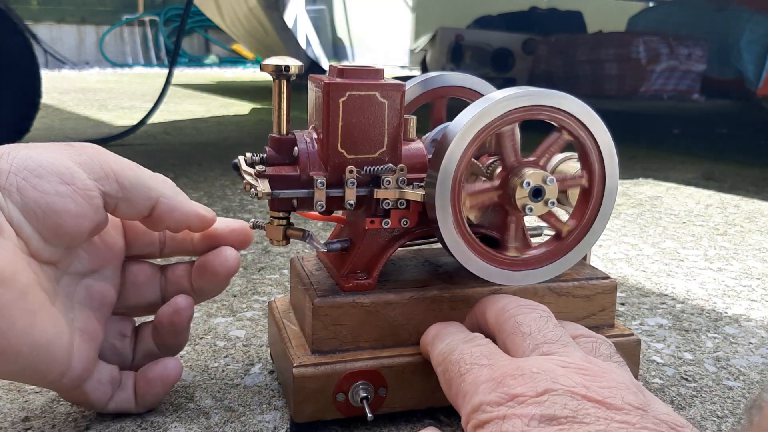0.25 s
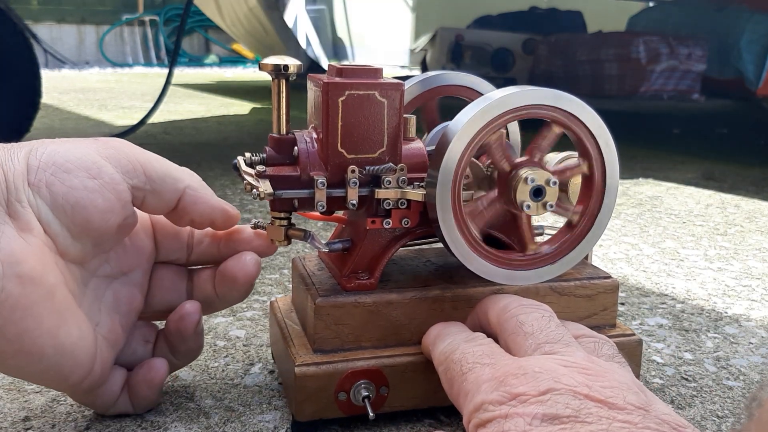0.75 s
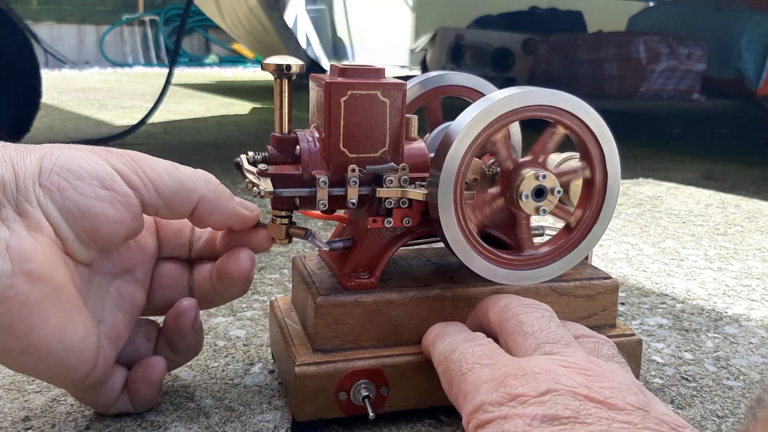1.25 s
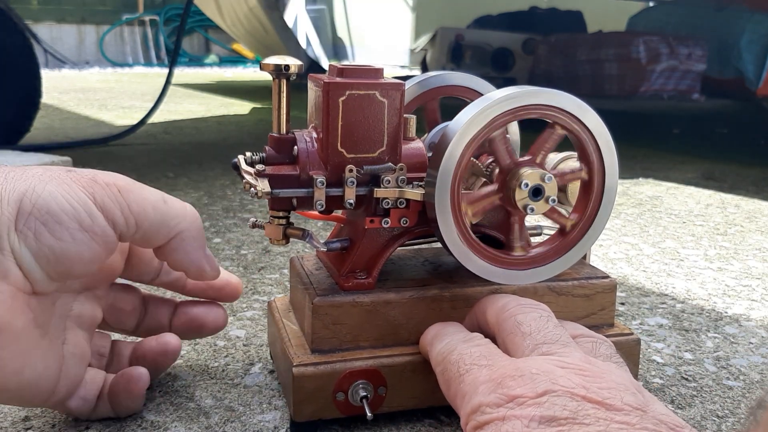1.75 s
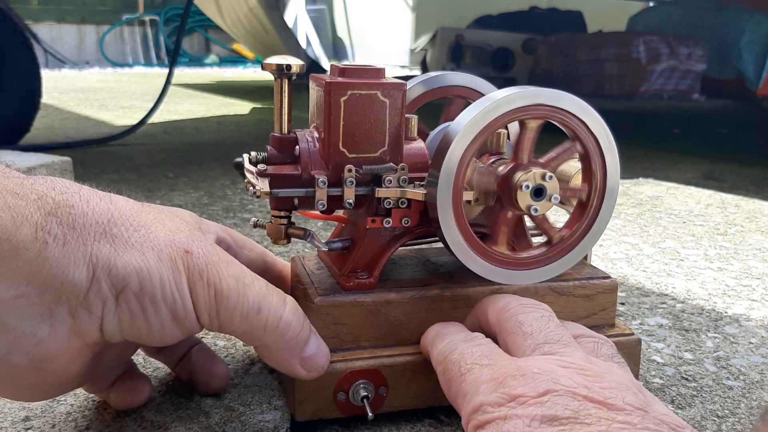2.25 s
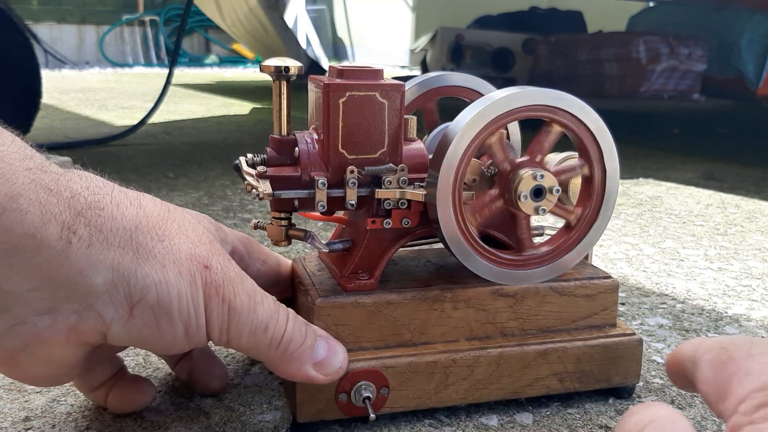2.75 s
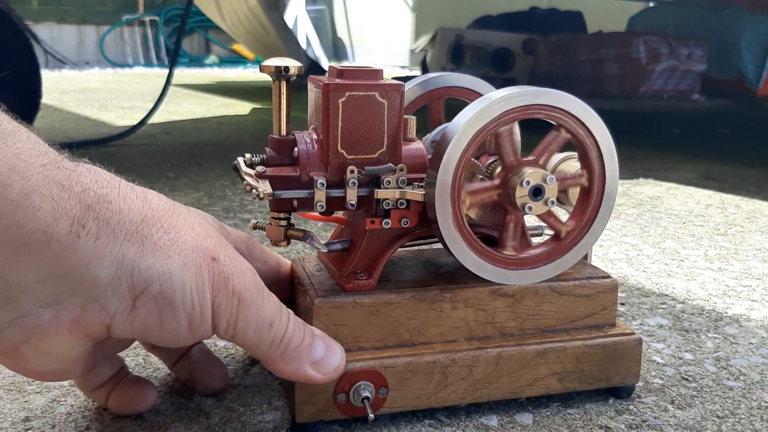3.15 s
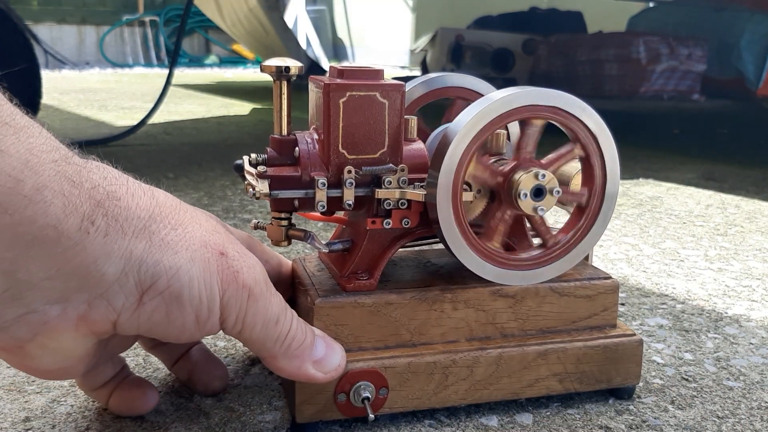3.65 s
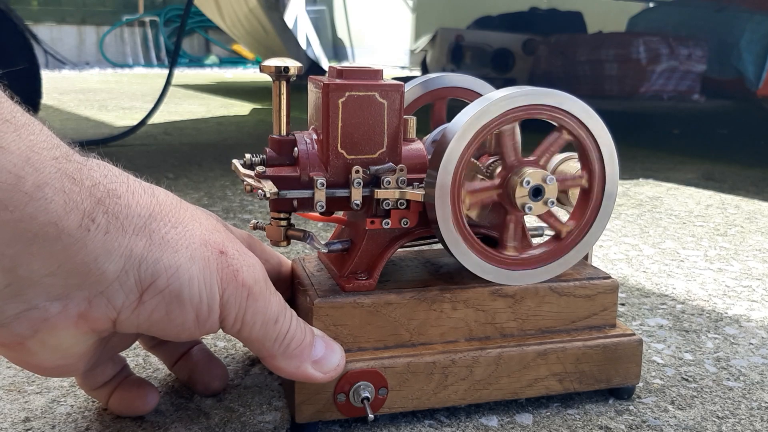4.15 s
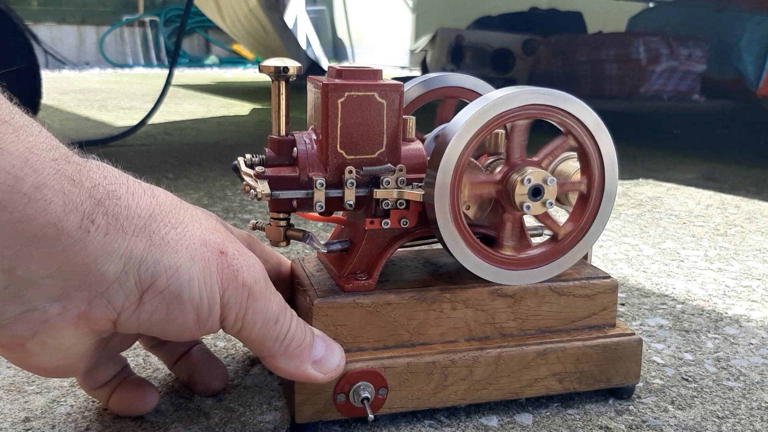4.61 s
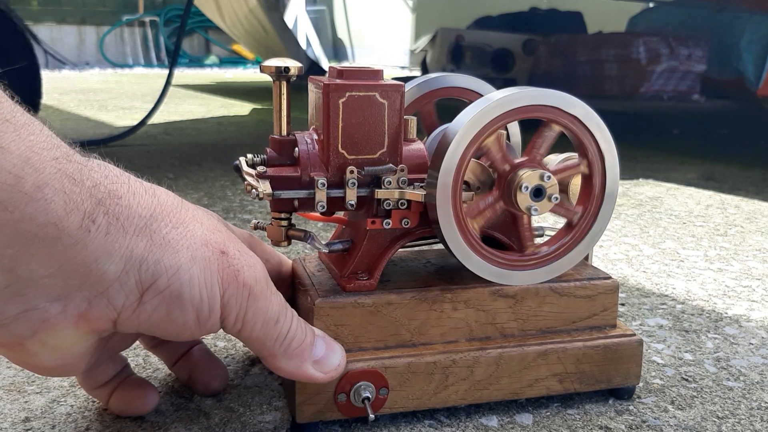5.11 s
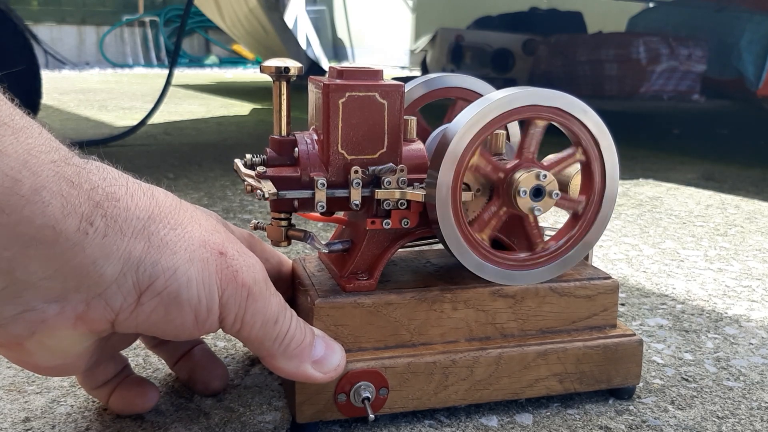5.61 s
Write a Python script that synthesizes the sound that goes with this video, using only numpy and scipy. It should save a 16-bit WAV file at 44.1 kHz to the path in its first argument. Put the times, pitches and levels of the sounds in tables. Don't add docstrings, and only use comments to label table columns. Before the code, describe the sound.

Close, dry stereo pickup of a model petrol engine: about ten bright clicks a second with small linkage rattles, whirring gears and twin puffs per cycle. Short groups of buzzing valve slaps and hard, low-bodied pops come at about 0.7, 2.1, 3.4, 4.4 and 5.8 seconds. Soft wooden hand knocks occur near three seconds, then wind thumps on the left over a faint yard hum.

```python
import sys
import numpy as np
from scipy import signal
from scipy.fft import rfft, irfft, next_fast_len
from scipy.io import wavfile
from scipy.ndimage import map_coordinates

SR = 44100
rng = np.random.default_rng(int(sys.argv[2]) if len(sys.argv) > 2 else 0)


def generate_wav(signal):
    frames = np.transpose(np.atleast_2d(signal))
    scaled = np.clip(frames, -1, 1) * 32767
    pcm = np.round(scaled).astype(np.int16)
    wavfile.write(sys.argv[1], SR, pcm)


def how_loud(loudness_db):
    steps = np.asarray(loudness_db, float) / 20
    return 10 ** steps


N = 258993
SECONDS = np.arange(N) / SR
FLAT = [(100, 0), (9000, 0)]


def unit(x):
    return x / np.sqrt(np.mean(x ** 2) + 1e-20)


def along(points, hz):
    f, v = np.transpose(points)
    return np.interp(np.log(hz + 1), np.log(f + 1), v)


def filtered(x, response):
    m = next_fast_len(N + 8192)
    return irfft(rfft(x, m) * response(np.fft.rfftfreq(m, 1 / SR)), m)[..., :N]


def modes(table):
    def response(f):
        total = 0
        for k, (centre, width, db) in enumerate(table):
            damping = 1j * f * width
            total = total + (-1) ** k * how_loud(db) * damping / (centre * centre - f * f + damping)
        return total
    return response


def noise(colour):
    # frequency in Hz, left-right likeness from 0 to 1.
    alike = [(300, 0.93), (1400, 0.24), (4000, 0.47), (10000, 0.28)]

    def mid_side(hz):
        turn = np.arccos(np.clip(along(alike, hz), -1, 1)) / 2
        return how_loud(along(colour, hz)) * [np.cos(turn), np.sin(turn)]

    mid, side = filtered(rng.standard_normal((2, N)), mid_side)
    return unit(np.array([mid + side, mid - side]))


def wobble(rate):
    return map_coordinates(rng.standard_normal(int(N * rate / SR) + 4), [SECONDS * rate])


def placed(times, gains, shape):
    out = np.zeros(N + SR)
    copy = shape(np.arange(SR // 8) / SR)
    starts = np.round(np.ravel(times) * SR).astype(int)
    for start, gain in zip(starts, np.ravel(gains)):
        out[start:start + len(copy)] += gain * copy
    return out[:N]


def swell(rise, t60):
    return lambda t: (1 - np.exp(-t / rise)) * how_loud(-60 * t / t60)


def ring(hz, rise, t60):
    return lambda t: swell(rise, t60)(t) * np.sin(2 * np.pi * hz * t)


def cam():
    # first cam drop in seconds, speed in cycles per s, drag in cycles per s per s.
    coasts = [
        (.0028, 9.07, 2.733),
        (.8542, 10.4985, 3.014),
        (2.2369, 10.437, 3.076),
        (3.5179, 9.954, 3.0435),
        (4.5177, 10.6976, 3.003),
    ]
    # cam click, ring, out-breath and in-breath, all in dB.
    coast_db = [(-19, -39, -27, -27), (-18.5, -36.5, -26.5, -25), (-19, -33, -28, -28),
                (-17.5, -33, -27, -27.5), (-17.5, -32.5, -27.5, -30)]
    slow_loss_db = [0.38, 0.9, 0.8, 0.42]
    cycle_scatter_db = [1, 1.2, .5, .5]
    # start in seconds, click, ring, out-breath, in-breath in dB.
    working = [(0.4788, -20.5, -37, -36, -33.5), (0.6138, -29, -35, -55, -39), (0.745, -22, -33, -54, -31),
               (1.9933, -19, -33, -49, -28), (2.1286, -23, -37, -40, -27), (3.1167, -20.5, -31, -46, -33.5),
               (3.2586, -35, -35, -50, -33), (3.401, -25, -38, -42, -27), (4.1891, -19, -32, -40, -29),
               (4.3088, -17, -36, -28.5, -33), (4.4145, -20, -28, -42, -28), (5.625, -20.5, -36, -45, -47),
               (5.7514, -21, -31, -38.5, -49), (5.858, -14.5, -30, -15, -36)]
    full_speed = 10.7

    rows = list(working)
    let_go = np.transpose(working)[0]
    for (start, speed, drag), levels in zip(coasts, coast_db):
        now = np.sqrt(speed ** 2 - 2 * drag * np.arange(12))
        s = start + (speed - now) / drag
        loss_db = np.outer((full_speed - now) ** 2, slow_loss_db)
        db = levels - loss_db + cycle_scatter_db * rng.standard_normal((12, 4))
        coasting = s + .5 / now < let_go[let_go > start].min()
        rows += list(np.column_stack([s, db])[coasting])
    return np.array(sorted(map(tuple, rows)))


def valve_gear(drops):
    # share of cycle, click in dB, ring in dB, box in dB.
    linkage = [
        (.01, -8.5, -4, 3.5),
        (0.068, -13, -18, -33),
        (0.311, -13.5, -24, -34),
        (0.529, -16, -7, -1.5),
        (0.779, -10.5, -5, -24),
        (0.831, -16, -9, -26),
    ]
    # start in seconds, peak in dB, ring in dB.
    latch = [(0.519, -42, -57), (0.5306, -36, -45), (0.545, -28, -32), (0.5489, -19, -45),
             (0.663, -42, -60), (.739, -33, -48), (0.812, -32, -93), (1.925, -43, -44), (2.002, -38, -25.5),
             (2.0497, -31, -69), (2.187, -35, -55), (2.202, -40, -50), (3.15, -33, -38),
             (3.166, -27.5, -40), (3.196, -48, -43), (3.219, -39, -37), (3.315, -38, -61),
             (3.343, -39, -34), (4.104, -33, -56), (4.1607, -33, -56), (4.241, -31.5, -59),
             (4.344, -52, -56), (4.46, -39, -49), (4.482, -41, -32), (5.647, -33, -29), (5.744, -38, -33)]
    # frequency in Hz, width in Hz, level in dB.
    frame = [(1133, 96, -2), (1685, 120, 4), (2460, 160, -6), (3580, 430, -8.5), (5660, 250, -7.5)]
    # frequency in Hz, level in dB.
    click = [(800, -17), (2500, 17), (3800, 10.5), (6000, 11.5), (10000, 10.5), (13000, 14.5), (16000, 5)]

    s, db, ring_db, out_db = np.transpose(drops)[:4]
    open_db = 0.5 * (out_db[:-1, None] - np.median(out_db))
    share, click_step, ring_step, box_step = np.transpose(linkage)
    chance = rng.standard_normal((len(s) - 1, 3, len(share)))
    light_s = s[:-1, None] + np.diff(s)[:, None] * share + 0.0006 * chance[:, 0]
    scatter_db = 1.1 * chance[:, 1:]
    light_db = np.median(db) + open_db + click_step + scatter_db[:, 0]
    light_ring = np.median(ring_db) + open_db + ring_step + scatter_db[:, 1]
    latch_s, latch_db, latch_ring = np.transpose(latch)

    times = np.concatenate([s, light_s.ravel(), latch_s])
    crack_db = np.concatenate([db, light_db.ravel(), latch_db]) + 2.0
    crack = placed(times, how_loud(crack_db), lambda t: swell(.0004, .0045)(t) * 1.17 + swell(.0015, .018)(t) * 0.4)

    blows = how_loud(np.concatenate([ring_db, light_ring.ravel(), latch_ring]) + 20.5)
    scrape = placed(times, blows, swell(0.0027, 0.041)) * noise(FLAT)
    tap = placed(times, blows, swell(0.00014, 0.0037))
    knocked = filtered(0.37 * scrape + 0.67 * tap, modes(frame))

    thuds = how_loud(-34.5 + open_db + box_step + scatter_db[:, 1])
    box = placed(light_s, thuds * (light_s < 1.5), ring(825, 0.00034, 0.037))
    box += placed(light_s, thuds * (light_s >= 1.5), ring(757.0, 0.0011, 0.028))

    spring = placed(s, how_loud(db - 2.0 - 29.0 * (s < 3.1)), ring(11520, 0.00029, 0.011))
    latch_sings = (latch_s > .7) * (latch_db > -33)
    spring += placed(latch_s, how_loud(latch_db + 10.0) * latch_sings, ring(11500, 0.00084, 0.013))
    spring += placed(light_s, how_loud(light_db - 4) * (light_s > 3), ring(11350, .0005, 0.011))
    return crack * noise(click) + 3 * knocked + box + spring


def parts(drops):
    # share of cycle, frequency in Hz, dB over the ring level, t60 in seconds.
    part_notes = [(0.0212, 2700, 2, 0.038), (0.01513, 1690, 5, 0.037), (0.0119, 3750, 4.5, 0.017),
                  (.07, 1160, 5, 0.028), (.518, 2400, 6.5, 0.018), (.78, 3810, 9.5, 0.01),
                  (0.99, 5900, 18, 0.011), (.545, 1680, 9, 0.024), (.775, 3110, 5, 0.014),
                  (0.73, 1500, 3, 0.042), (0.81, 1150, -1.5, .07), (.3, 2400, -3, 0.04),
                  (0.15, 1160, -11, 0.12), (0.59, 5200, 2, 0.0097), (0.44, 4900, -8, .008),
                  (0.37, 7500, -16, .015), (0.014, 7500, -7, 0.036), (0.36, 7500, -9, 0.031),
                  (0.53, 7300, -12, .015), (0.95, 4200, -3, 0.025), (.5, 765, -5.5, 0.032),
                  (0.0193, 774, -9, 0.055), (0.7, 890, -12.5, 0.055)]
    s, _, ring_db, out_db = np.transpose(drops)[:4]
    seated_db = 0.72 * np.minimum(out_db[:-1] - np.median(out_db), 0)
    level_db = 0.61 * ring_db[:-1] + 0.39 * np.median(ring_db) + seated_db
    chance = rng.standard_normal((len(s) - 1, len(part_notes), 2))
    out = np.zeros(N)
    for k, (share, hz, db, t60) in enumerate(part_notes):
        times = s[:-1] + share * np.diff(s) + .0006 * chance[:, k, 0]
        out += placed(times, how_loud(level_db + db + 1.34 * chance[:, k, 1]), ring(hz, 0.001, t60))
    return out


def breathing(drops):
    # frequency in Hz, width in Hz, level in dB.
    port = [(800, 230, 12), (1560, 370, 13), (2470, 390, 23), (2960, 380, 9.5), (6660, 3800, 2),
            (13000, 5700, -41)]
    # frequency in Hz, width in Hz, level in dB.
    wheels = [(731, 50, 4.5), (891.4, 22, 6.5), (1131, 104, 6), (1568, 62, 8.5), (1750, 53, 1),
              (2010, 49, 2.5), (4590, 59, -4.5), (5490, 79, -9), (7550, 90, -15)]
    # frequency in Hz, level in dB.
    whirr = [(200, -10), (500, -20), (1200, -0.5), (2500, 10.5), (4000, -3), (8000, -10), (16000, -18)]
    hiss = [(2500, -12), (5000, 4), (8000, 5), (16000, -1)]

    s, _, _, out_db, in_db = np.transpose(drops)
    turn = np.interp(SECONDS, s, np.arange(len(s)))
    cycle = turn.astype(int)
    share = turn - cycle
    out = np.exp(-((share - .43) / 0.06) ** 4)
    drawn = np.exp(-((share - .925) / 0.061) ** 4)
    puffs = how_loud(out_db[cycle]) * out + how_loud(in_db[cycle]) * drawn
    air = unit(filtered(noise(FLAT), modes(port)))

    stroke = (2 * share + 0.242) % 1
    arch = np.sin(np.pi * np.clip(stroke / .5, 0, 1))
    apart = np.array([wobble(300), wobble(300)])
    note_hz = 2050 + 650 * arch + 110 * wobble(400) + 40 * apart
    note = np.sin(2 * np.pi * np.cumsum(note_hz, axis=1) / SR)
    lumps = unit(how_loud(1.05 * wobble(390)))

    open_db = np.interp(turn, np.arange(len(s)) + .5, out_db) - np.median(out_db)
    gears = how_loud(-47.0 + 0.5 * open_db + 3.6 * (out + drawn) + 2.4 * wobble(60)) * noise(whirr)
    hum_level = how_loud(-46.0 + 0.046 * open_db + 3.9 * wobble(40))
    hum = hum_level * unit(filtered(noise(FLAT), modes(wheels)))
    leak_db = -52.5 + 5.2 * (out + drawn) + 1.0 * np.maximum(open_db, -14) + 4.5 * wobble(90)
    leak = how_loud(leak_db) * noise(hiss)
    return puffs * lumps * (0.53 * air + 0.59 * note) + gears + hum + leak


def intake():
    # opening in seconds, first slap in ms, fading in dB per slap, slap in dB, crack in dB.
    strokes = [(0.557, 6.2, -2.5, -19, -20.5), (0.6235, 5.9, 0.5, -20, -29), (0.7534, 6.9, -2, -17.5, -28),
               (2.0058, 5.94, -1.5, -17.5, -14), (2.1367, 6.7, -2, -16, -24.5),
               (3.2707, 6, -2, -18.5, -17.5), (3.4104, 6.7, -1, -18.5, -26.5), (4.202, 7, -2, -18, -15.5),
               (4.3716, 7.4, -3, -16.5, -20.5), (4.426, 7.4, -9, -16.5, -26),
               (5.6515, 6.3, -21, -21, -17.5), (5.766, 8, -18, -16, -21.5)]
    # frequency in Hz, level in dB.
    suction = [(300, -9), (900, 0.5), (1700, 0), (3800, -4.5), (6000, -10), (10000, -6.5), (13500, 2),
               (16000, 1.5)]
    valve = [(800, 4.5), (2500, -2), (4000, 10), (6000, -0.5), (9000, 7), (12500, 16.5), (16000, 2)]
    flutter_ms, hiss_under_slap_db = 8.4, 15.5

    s, first, fading_db, slap_db, crack_db = np.transpose(strokes)
    hiss_db = slap_db - hiss_under_slap_db
    slaps = s[:, None] + (first[:, None] + flutter_ms * np.arange(3)) / 1000
    gain = how_loud(slap_db[:, None] + fading_db[:, None] * [0, .4, 1.8])

    def glide(t):
        turns = 1900 * t - 1300 * 0.00046 * (1 - np.exp(-t / 0.0007))
        return swell(.0001, .014)(t) * np.sin(2 * np.pi * turns)

    def hammer(t):
        low = -ring(135, .0002, .028)(t) * .62 - ring(245, .0003, .028)(t) * .36
        return low - ring(700, .00005, .006)(t) * .9

    def inlet(t):
        high = -ring(1850, .00002, .013)(t) * 1.05 - ring(1950, .003, .03)(t) * .45
        return high - ring(1450, .0005, .02)(t) * .25

    def gulp(t):
        return ring(140, .0005, .025)(t) * 0.94 - ring(450, .0001, .006)(t) * 0.65 - glide(t) * 0.51

    def rush(t):
        lift = np.sin(np.pi * np.clip(t / 0.0081, 0, 1)) ** 2
        return lift * 1.46 + swell(.002, .06)(t) * 2.55

    def seat_ring(t):
        high = -ring(3700, 0.00005, 0.008)(t) - ring(4900, .00005, .003)(t) * 0.73
        return high - ring(780, .00005, .015)(t) * 0.83

    tube = placed(slaps - .0001, gain, hammer) + placed(slaps + .0001, gain, inlet)
    tube += placed(s, how_loud(slap_db), gulp)
    opened = np.column_stack([s - .001, slaps[:, :2] + 0.00079])
    flow_db = hiss_db[:, None] + fading_db[:, None] * [0, .1, .9] + [1.5, .5, -.3]
    flow = placed(opened, how_loud(flow_db), rush) * unit(how_loud(2.4 * wobble(500)))
    crack = placed(s, how_loud(crack_db), lambda t: swell(.0003, .007)(t) * 2.27 + swell(.0005, .04)(t) * 0.49)
    seat = placed(s, how_loud(0.34 * slap_db + 1.06 * crack_db + 3.5), seat_ring)
    return tube + seat + flow * noise(suction) + crack * noise(valve)


def exhaust():
    # start in seconds, pop, whistle, thump and jet, all in dB.
    openings = [(.717, -6, -9, -15.5, -16), (.831, -5.5, -15, -16.5, -14.5),
                (2.0997, -6.5, -11, -16.5, -15.5), (2.2138, -4, -7, -17, -16),
                (3.3707, -4.5, -13, -17, -18.5), (3.493, -3.5, -7, -15.5, -18.5),
                (4.283, -6, -14, -14.5, -14.5), (4.4954, -3.5, -10, -14, -15.5),
                (5.725, -7, -14, -14, -15.5), (5.833, -5.5, -27, -14.5, -11)]
    # frequency in Hz, dB over the whistle.
    cage = [(4140, -12), (4200, -2), (3900, -5), (4110, -1.5), (3780, -8), (3850, -2), (3630, 4),
            (3830, -1.5), (3840, -7), (3900, -10)]
    # frequency in Hz, level in dB.
    jet_colour = [(300, -9), (900, -5), (1800, 11.5), (3500, 4), (5500, 1.5), (7700, 0.5), (16000, 3)]
    strain_db = -33
    jet_peak_s, jet_width_s = 0.0034, 0.0013

    s, pop_db, whistle_db, thump_db, jet_db = np.transpose(openings)
    pop_gain, thump_gain = how_loud(pop_db), how_loud(thump_db)
    pop = placed(s, pop_gain, lambda t: ring(1730, .001, .0034)(t) * 4.8 + ring(170, .00005, .0016)(t) * 3.6)
    echo = placed(s + .00226, pop_gain, lambda t: -ring(1595, .005, .016)(t))
    echo += placed(s + .003, pop_gain,
                   lambda t: ring(1540, .004, .04)(t) * 0.084 + ring(2040, .001, .02)(t) * 0.077)

    def pipe(t):
        low = ring(3020, .001, .014)(t) * 0.83 + ring(2480, .001, .018)(t) * 0.52
        return low + ring(7750, .001, .02)(t) * 0.16

    whistle = placed(s + 0.0018, how_loud(whistle_db), pipe)
    for at, level, (hz, db) in zip(s, whistle_db, cage):
        whistle += placed([at + 0.001405], [how_loud(level + db)], ring(hz, 0.00061, 0.012))

    thump = placed(s + .00155, thump_gain, lambda t: -ring(102, .0009, .024)(t) * 2)
    rebound = placed(s + .0058, thump_gain, lambda t: ring(325, .00006, .008)(t) * 1.55)
    rebound += placed(s + .00545, thump_gain, lambda t: ring(720, .00002, .0046)(t) * .95)

    def burst(t):
        return np.exp(-((t - jet_peak_s) / jet_width_s) ** 2) * 0.73 + swell(.0003, .06)(t) * 0.49

    def load(t):
        return (ring(1660, .004, .15)(t) + ring(1530, .006, .15)(t) * 0.26) * (t < .027)

    jet = placed(s, how_loud(jet_db), burst)
    strain = placed(s - .026, how_loud(pop_db + strain_db), load)
    return strain + pop + echo + whistle + thump + rebound + jet * noise(jet_colour)


def rocker():
    # start in seconds, peak in dB, frequency in Hz.
    hunting = [(3.166, -24, 1680), (2.9, -27, 1620), (3.222, -27, 1650), (3.258, -30, 1380),
               (4.262, -30, 1800), (4.335, -33, 1600), (2.6, -35, 1170), (0.57, -28, 1500)]
    return sum(placed([s], [how_loud(db)], ring(hz, 0.0026, .04)) for s, db, hz in hunting)


def hand():
    # start in seconds, peak in dB, frequency in Hz.
    knocks = [(2.999, -32, 140), (3.049, -38, 140), (3.055, -23, 760), (3.07, -25, 710), (3.085, -27, 750),
              (3.1, -32, 770), (3.115, -23, 780), (3.135, -25, 760), (3.15, -35, 495), (3.305, -41, 300),
              (3.2203, -31, 900), (3.219, -24.5, 191), (3.224, -27, 700)]
    out = np.zeros(N)
    for s, db, hz in knocks:
        out += placed([s], [how_loud(db)], lambda t: -ring(hz, .001, 14 / hz)(t) * .6)
    return out


def ports(x):
    # frequency in Hz, level in dB.
    left_port = [(100, -0.5), (700, 0.5), (1300, -2), (2400, 0.5), (4400, -2), (6500, -11.5), (7700, -14.5),
                 (8100, -20), (8500, -47), (8900, -37), (9600, -20), (12500, -10), (14500, -5.5),
                 (16000, -39.5)]
    right_port = [(100, -1.5), (700, -3.5), (1300, -2), (2400, -3), (4400, 0.5), (6500, 3), (7600, 6.5),
                  (8200, 0.5), (8450, -2.5), (8620, -17), (8850, -4.5), (9300, -4), (10200, -1), (12500, 1),
                  (14000, -1), (15800, 4.5)]
    out = []
    for channel, colour in zip(x, (left_port, right_port)):
        cepstrum = irfft(np.log(how_loud(along(colour, np.fft.rfftfreq(1024, 1 / SR)))))
        cepstrum[1:512] *= 2
        cepstrum[513:] = 0
        impulse = irfft(np.exp(rfft(cepstrum)))
        out.append(signal.fftconvolve(channel, impulse)[:N])
    return np.array(out)


def wind():
    # time in seconds, buffet in dB.
    strength = [(0, -54.5), (.3, -46.5), (1.75, -53), (2.05, -81), (3.35, -56), (3.7, -39.5), (3.85, -33),
                (3.93, -43), (4.1, -35.5), (4.17, -27), (4.23, -24), (4.32, -35.5), (4.52, -35), (4.6, -49),
                (4.68, -40), (4.95, -40.5), (5.08, -43), (5.3, -45), (5.37, -48), (5.5, -44.5), (5.65, -68)]
    # frequency in Hz, level in dB.
    buffet_colour = [(20, -24), (45, 7.5), (65, -3), (110, -10.5), (200, -24), (400, -38.5), (800, -90)]
    # start in seconds, peak in dB, frequency in Hz.
    gust_pops = [
        (3.851, -10.5, 64.4),
        (3.99, -17.5, 76),
        (5, -26, 82),
    ]
    thumps = [(0.169, -26.5, 56), (0.26, -23.5, 74.6), (3.82, -19, 70.4), (3.95, -23, 65), (4.034, -22, 65),
              (4.095, -16.5, 60), (4.157, -24, 80), (4.178, -20, 111), (4.205, -17, 58), (4.234, -21, 66),
              (4.251, -13, 73.6), (4.533, -25, 89), (4.634, -25.5, 84), (4.656, -25, 85),
              (4.672, -20.5, 82.6), (4.712, -22.5, 69.6), (4.792, -19, 60), (4.808, -21, 60),
              (4.831, -24.5, 110), (4.848, -29, 121), (4.904, -28, 80), (4.93, -27, 75),
              (4.966, -27.5, 132), (5.126, -27, 73.4), (5.157, -23, 79), (5.171, -30, 101),
              (5.255, -33, 65), (5.29, -26, 62), (5.309, -29, 65), (5.419, -27, 80), (5.449, -23, 73),
              (5.51, -32, 55)]

    level = how_loud(np.interp(SECONDS, *np.transpose(strength)) + 9.5)
    rumble = filtered(rng.standard_normal((2, N)), lambda hz: how_loud(along(buffet_colour, hz)))
    buffet = level * unit(how_loud(1.7 * wobble(16)) * rumble)
    pops = np.zeros(N)
    for s, db, hz in gust_pops:
        def gust(t):
            low = -ring(hz, .004, .08)(t) * 3.8 - ring(190, .001, .03)(t) * 1.2
            return low - ring(320, .002, .015)(t) * 0.067
        pops += placed([s], [how_loud(db)], gust)
    for s, db, hz in thumps:
        pops += placed([s], [how_loud(db)],
                       lambda t: -ring(hz, .004, .07)(t) * 3.05 + ring(2.3 * hz, .003, .04)(t) * 0.5)
    return buffet * how_loud([[0], [-11]]) + pops * how_loud([[0], [-25]])


def yard():
    # frequency in Hz, level in dB.
    yard_colour = [(15, -36), (25, -0.5), (65, 7.5), (100, -4.5), (167, -13), (239, -8), (308, -15.5),
                   (545, -16), (700, -41), (910, -94), (1540, -120)]
    return how_loud(-44.0) * noise(yard_colour)


def self_noise():
    # frequency in Hz, level in dB.
    hiss_colour = [(1500, -12), (4000, 9), (7500, 1), (8300, -23), (8900, -20), (10000, -1), (16000, -5)]
    return how_loud(-61.5) * noise(hiss_colour)


def scene():
    drops = cam()
    engine = valve_gear(drops) + parts(drops) + breathing(drops) + intake() + exhaust() + rocker() + hand()
    return ports(engine) + wind() + yard() + self_noise()


def low_pass(x):
    return signal.sosfilt(signal.butter(12, 16970, fs=SR, output="sos"), x)


def record(dry):
    def band(hz):
        top = 1 / np.sqrt(1 + (hz / 15800) ** 500) + .03 * (hz < 16600) + .002 * (hz < 16970)
        return (1j * hz / (1j * hz + 38)) ** 5 * top
    return low_pass(filtered(dry, band))


dry = scene()
out = record(dry)
generate_wav(out)
```